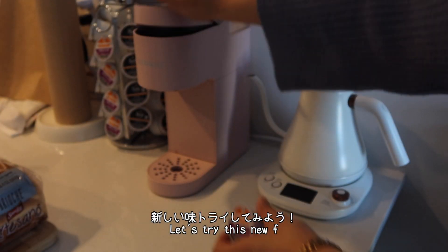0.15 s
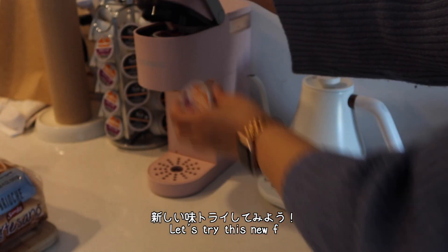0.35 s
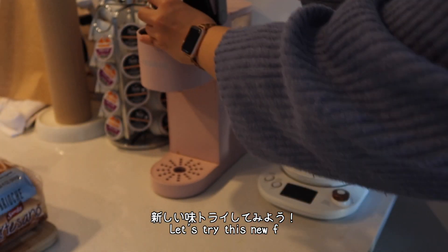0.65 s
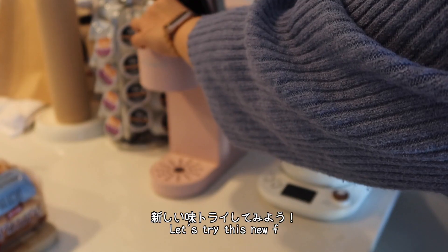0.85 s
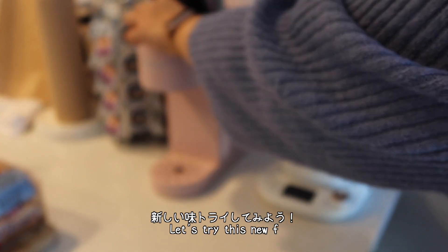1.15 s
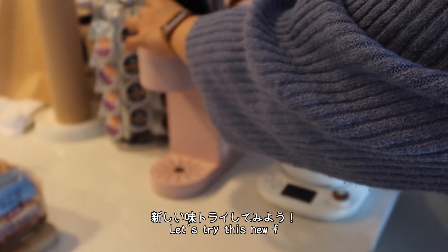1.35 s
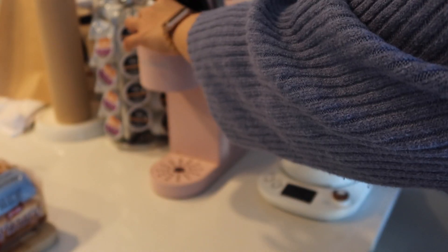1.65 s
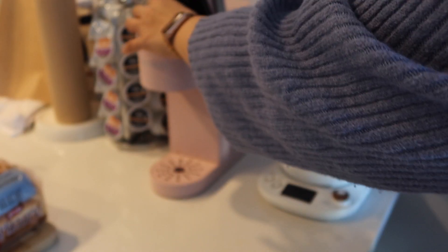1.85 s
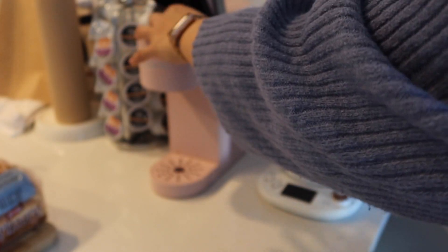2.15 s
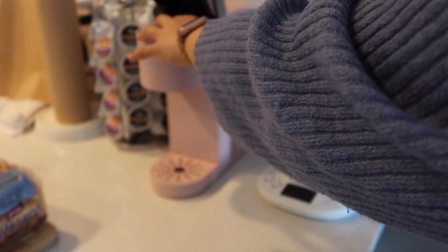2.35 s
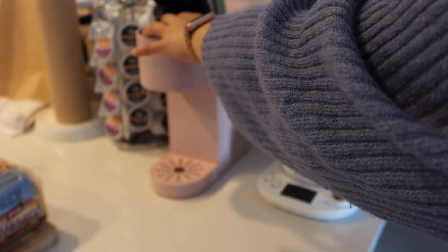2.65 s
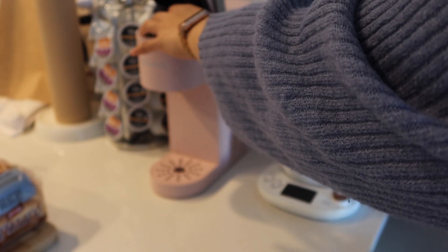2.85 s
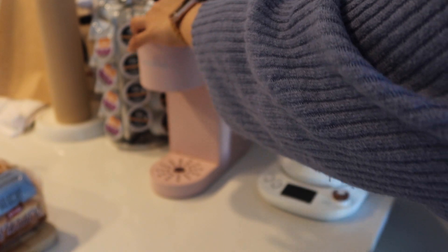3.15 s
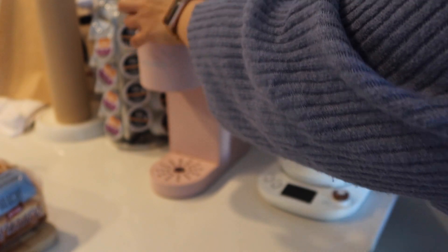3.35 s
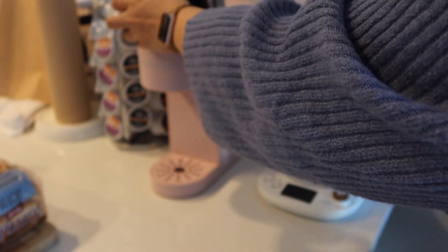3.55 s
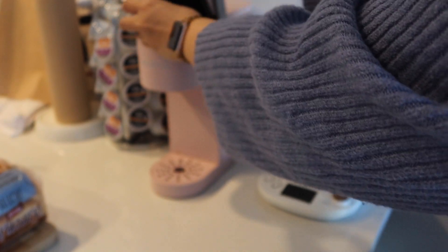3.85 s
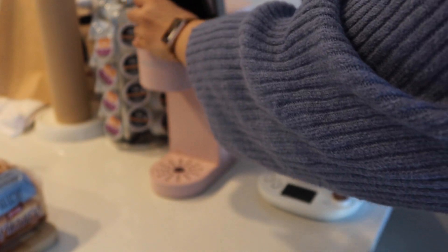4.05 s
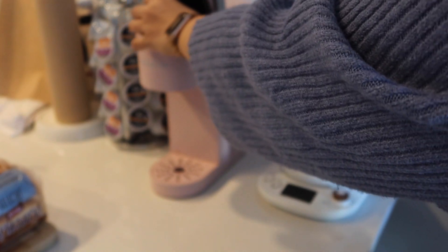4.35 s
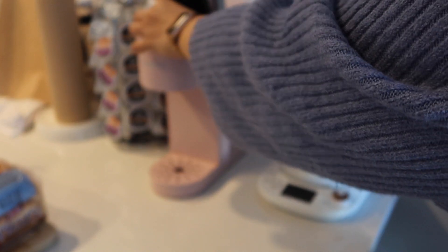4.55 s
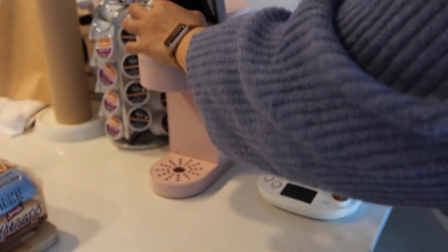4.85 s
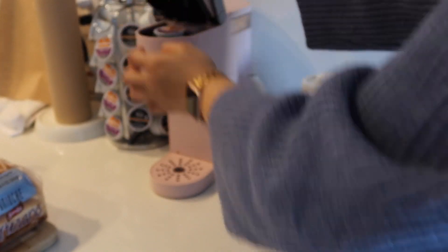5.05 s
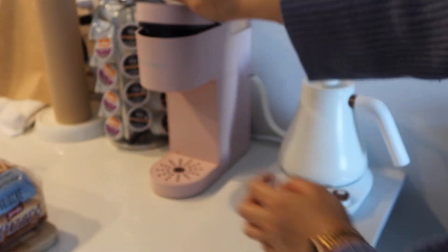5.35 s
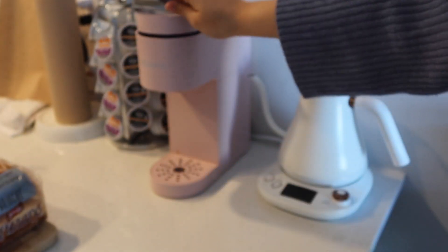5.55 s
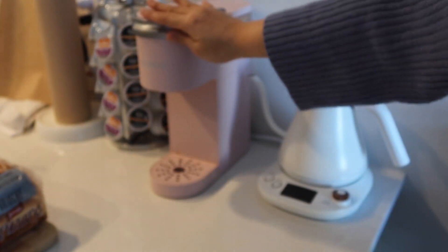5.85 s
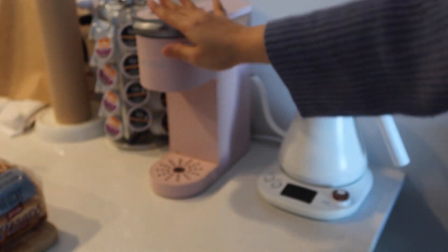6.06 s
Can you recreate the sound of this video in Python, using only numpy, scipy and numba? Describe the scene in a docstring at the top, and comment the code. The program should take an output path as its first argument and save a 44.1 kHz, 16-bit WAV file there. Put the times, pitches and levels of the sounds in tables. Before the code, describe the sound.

Small hollow plastic knocks, clicks and finger rubs over quiet room air end in one very loud, bright latch snap with a brief rattle.

```python
"""Pod coffee maker, lid and latch

On a kitchen counter, about a metre from a nearly mono microphone: the lid is pulled open, a pod is pushed
into its holder and turned, then the lid is pressed down until its latch snaps.
Each blow rings a plastic part as damped modes and dense noise, and thumps the housing.
Fingers rub and plastic scrapes in tiny slips; a bare kitchen echoes it, over room air and a low hum.
The echo breaks off once, early on; at the snap a limiter ducks the level and lets the echo swell back."""
import sys
import numpy as np
from scipy import signal
from scipy.fft import rfft, irfft
from scipy.io import wavfile
from numba import njit

SR = 44100
rng = np.random.default_rng(int(sys.argv[2]) if len(sys.argv) > 2 else 0)


def log_audio(samples):
    """Write samples as a 16-bit WAV file to the path given in sys.argv[1]."""
    # one column per channel
    frames = np.atleast_2d(samples).T
    # limit to full scale, then quantise
    limited = np.clip(frames, -1, 1)
    pcm = np.round(limited * 32767).astype(np.int16)
    wavfile.write(sys.argv[1], SR, pcm)


N = 274302
TIME = np.arange(N) / SR
RING_TIME = np.arange(SR // 4) / SR


def undb(db):
    """Decibels to gain."""
    return 10 ** (np.asarray(db) / 20)


def on_log(points, hz):
    """Read (Hz, value) points on a log-frequency axis."""
    f, value = np.transpose(points)
    return np.interp(np.log(np.maximum(hz, 1)), np.log(f), value)


def colour(x, points):
    """Shape a noise by a (Hz, dB) spectrum."""
    gain = undb(on_log(points, np.fft.rfftfreq(len(x), 1 / SR)))
    return irfft(rfft(x) * gain, len(x))


def level(x, db):
    """Set the rms level."""
    return x * undb(db) / np.sqrt(np.mean(x ** 2))


def attack_level(x, db):
    """Set the rms level of the first hundredth of a second."""
    return x * undb(db) / np.sqrt(np.mean(x[:SR // 100] ** 2))


def add(track, s, sound):
    """Mix a sound into the track at time s."""
    start = int(s * SR)
    track[start:start + len(sound)] += sound[:N - start]


def fade(t, t60):
    """Exponential decay, 60 dB down after t60."""
    return np.exp(-np.log(1000) * t / t60)


def soften(x, hz):
    """A softer contact pushes for longer and excites less treble."""
    pole = signal.butter(1, min(hz, SR / 3), fs=SR, output="sos")
    return signal.sosfilt(pole, signal.sosfilt(pole, x))


def arch(s, length):
    """One smooth rise and fall around time s."""
    return np.cos(np.pi * np.clip((TIME - s) / length, -.5, .5))


def swells(rows, rest_db):
    """Gain that rises and falls in one smooth arch per row, over a resting level."""
    arches = [undb(db) * arch(s, length) for s, length, db in rows]
    return np.sqrt(undb(rest_db) ** 2 + np.sum(np.square(arches), axis=0))


def drift(count):
    """Slow random wandering through evenly spaced points."""
    return np.interp(TIME, np.linspace(0, N / SR, count), rng.standard_normal(count))


# spectrum of the room air: f/Hz, level/dB
AIR_SPECTRUM = [(20, -20), (31, 5), (40, 6), (70, 0.5), (110, -1.5), (290, 0.5), (500, -8), (1000, -11.5),
                (2000, -18.5), (4500, -24.5), (8000, -31), (13000, -39), (15500, -50)]
# stereo width of the room air: f/Hz, side minus mid level/dB
AIR_WIDTH = [(60, -29), (110, -10), (200, -10), (380, -2.5), (700, -4), (1290, -1.5), (2380, 0), (4400, -1),
             (8120, -1.5), (15000, 1.5)]


def room_air(air_db=-46, swell_db=1.9):
    """Steady air noise of the kitchen, wide in the treble, its level drifting slowly."""
    mid, other = (level(colour(rng.standard_normal(N), AIR_SPECTRUM), air_db) for _ in range(2))
    side = colour(other, AIR_WIDTH)
    return np.array([mid + side, mid - side]) * undb(swell_db * drift(count=30))


# swells of the low hum: middle t/s, length t/s, level/dB
HUM_ARCHES = [(0.05, 0.85, -47.5), (0.9, 0.62, -41.5)]


def appliance_hum(hum_hz=75, waver_hz=6, rest_db=-55):
    """A low appliance hum: one sine whose pitch wavers."""
    pitch_hz = hum_hz + waver_hz * drift(count=60)
    hum = level(np.sin(2 * np.pi * np.cumsum(pitch_hz) / SR), 0)
    return hum * swells(HUM_ARCHES, rest_db)


# decay of the kitchen echo: f/Hz, t60 t/s
ECHO_T60 = [(100, 1.05), (400, 0.4364), (1500, 0.4554), (5000, 0.58), (8000, 0.3), (14000, 0.19)]
# colour of the kitchen echo: f/Hz, level/dB
ECHO_COLOUR = [(60, -4), (200, -5.5), (500, -2), (1500, -3), (5000, -8.5), (8000, -6.5), (15000, -7)]


def room_tail(build_s=0.0026):
    """Diffuse echo that builds up within milliseconds; every band dies at its own rate."""
    t = np.arange(SR) / SR
    noise, hz = rfft(rng.standard_normal(SR)), np.fft.rfftfreq(SR, 1 / SR)
    edges = np.geomspace(40, 20000, 16)
    tail = np.zeros(SR)
    for low, high in zip(edges, edges[1:]):
        band = irfft(noise * (hz >= low) * (hz < high), SR)
        tail += band * fade(t, on_log(ECHO_T60, np.sqrt(low * high)))
    tail = tail / np.sqrt(np.sum(tail ** 2))
    return colour(tail, ECHO_COLOUR) * (1 - np.exp(-t / build_s))


# stereo width of the echo: f/Hz, side minus mid level/dB
ECHO_WIDTH = [(100, -76), (500, -26), (1500, -24), (2500, -16), (4500, -9), (9000, 3.5)]


def kitchen(dry, echo_db=1, echo_cut_s=.753):
    """Direct sound, alike left and right, plus stereo echo; the ringing echo breaks off at echo_cut_s."""
    mid, side = room_tail(), colour(room_tail(), ECHO_WIDTH)
    spans = np.split(dry, [int(echo_cut_s * SR)])
    echo = []
    for tail in (mid + side, mid - side):
        # each span echoes only within itself
        echo.append(np.concatenate([signal.fftconvolve(span, tail)[:len(span)] for span in spans]))
    return dry + undb(echo_db) * np.array(echo)


# the crowd of short, overlapping plastic resonances: f/Hz, level/dB
SHELL_SPECTRUM = [(100, -24), (300, 3.5), (900, 5), (2500, 1.5), (6000, 0), (8000, -4), (15000, -6.5)]


def shell_ring(t60):
    """A plastic shell has so many close modes that it rings like fading coloured noise."""
    return colour(rng.standard_normal(len(RING_TIME)), SHELL_SPECTRUM) * fade(RING_TIME, t60)


def ring(modes, detune):
    """Damped modes of alternating sign; the grip shifts their pitch a little on every blow."""
    shift = 1 + detune * rng.standard_normal(len(modes))
    total = np.zeros(len(RING_TIME))
    for k, (hz, db, t60) in enumerate(modes):
        wave = np.sin(2 * np.pi * hz * shift[k] * RING_TIME)
        total += (-1) ** k * undb(db) * fade(RING_TIME, t60) * wave
    return total


# modes of the machine housing: f/Hz, level/dB, t60 t/s
HOUSING_MODES = [(85, -11.5, 0.062), (121, -14, 0.15), (189.2, 6, 0.036), (230, 2.5, 0.05),
                 (275.8, -1.5, 0.074)]


def blows(rows, modes, shell_db, shell_t60, detune, touch_db=-13, touch_s=0.0024):
    """Each blow rings the part's own modes and its dense shell resonances, and thumps the housing."""
    track = np.zeros(N)
    for s, db, bright_hz, thump_db in rows:
        shell, touch = shell_ring(shell_t60), shell_ring(shell_t60)
        part = attack_level(ring(modes, detune), 0) + attack_level(shell, shell_db)
        thump = attack_level(ring(HOUSING_MODES, detune=0.072), thump_db)
        add(track, s, attack_level(soften(part, bright_hz), db) + thump)
        # the surfaces graze each other just before they meet
        add(track, s - touch_s, attack_level(soften(touch, bright_hz), db + touch_db))
    return track


# strokes of the fingers over the plastic: middle t/s, length t/s, level/dB
FINGER_STROKES = [(0.25, 0.88, -45), (1.25, 0.75, -46), (2.25, 0.15, -55.5), (3.35, 0.37, -41.5),
                  (3.96, 0.26, -43.5), (4.5, 0.86, -58), (5.8, 0.95, -40.5)]


def rubbing(bright_hz=1000, t60=0.013, grip_db=-60):
    """Fingers stick and slip: tiny uneven clicks into the shell; the resting hand never keeps quite still."""
    clicks = (rng.random(N) < 250 / SR) * rng.standard_normal(N)  # about 250 a second
    rub = signal.fftconvolve(clicks, shell_ring(t60))[:N]
    return level(soften(rub, bright_hz), 0) * swells(FINGER_STROKES, grip_db)


# sharp dry ticks: t/s, level/dB
EDGE_TICKS = [(0.107, -42), (0.641, -39.5), (0.650, -48), (1.114, -45), (1.287, -53), (3.035, -61),
              (3.279, -46), (3.288, -51), (4.652, -48), (5.292, -44.5), (5.3695, -38), (5.458, -41)]


def ticks(t60=0.0079, low_hz=2500):
    """Hard edges flick past each other, too lightly to ring a part."""
    track = np.zeros(N)
    treble = signal.butter(2, low_hz, "high", fs=SR, output="sos")
    for s, db in EDGE_TICKS:
        burst = rng.standard_normal(len(RING_TIME)) * fade(RING_TIME, t60)
        add(track, s, attack_level(signal.sosfilt(treble, burst), db))
    return track


def slips(per_s, t60, count=4):
    """Tiny uneven stick-slip clicks, each ringing one of several spots of the plastic shell."""
    total = np.zeros(N)
    for _ in range(count):
        clicks = (rng.random(N) < per_s / count / SR) * rng.standard_normal(N)
        total += signal.oaconvolve(clicks, shell_ring(t60))[:N]
    return total


# plastic scraping over plastic as the lid or pod slides: middle t/s, length t/s, level/dB, brightness f/Hz
SLIDES = [(0.171, 0.043, -28, 3720), (0.211, 0.052, -32.5, 3200), (0.706, 0.014, -25, 3000),
          (3.118, 0.21, -36, 1400), (5.769, 0.01, -25, 7000)]


def scrapes():
    """Plastic grinds over plastic in a dense, grainy run of slips."""
    grains = slips(per_s=980, t60=0.0099)
    track = np.zeros(N)
    for s, length, db, bright_hz in SLIDES:
        track += level(soften(grains, bright_hz), db) * arch(s, length)
    return track


# side of the pod against the holder: t/s, level/dB, contact brightness f/Hz, thump level/dB, favoured f/Hz
WALL_BLOWS = [(1.001, -28.5, 5100, -47, 2290), (1.113, -30.5, 4600, -39, 1390),
              (3.3893, -31, 1900, -33.5, 1770), (4.158, -42.5, 1190, -45.5, 900),
              (4.224, -24, 1740, -46, 1140)]
# modes of the holder wall contact: f/Hz, level/dB, t60 t/s
WALL_MODES = [(713, -2.5, 0.016), (1098, -1.5, 0.028), (1216, -8.5, 0.081), (1390, -2, 0.013),
              (2010, -4.5, 0.024), (2460, -3.5, 0.018)]


def wall_knocks(octave_db=4.5):
    """The spot where the pod meets the holder decides which of its modes ring most."""
    track = np.zeros(N)
    for *blow, favoured_hz in WALL_BLOWS:
        # modes lose octave_db per octave away from the favoured pitch
        modes = [(hz, db - octave_db * abs(np.log2(hz / favoured_hz)), t60) for hz, db, t60 in WALL_MODES]
        track += blows([blow], modes, shell_db=-9, shell_t60=.022, detune=.006, touch_db=-30)
    return track


# pod rim catching as it turns: t/s, level/dB, contact brightness f/Hz, thump level/dB, top mode pitch ratio
RIM_CATCHES = [(1.154, -27.5, 4200, -31.5, 0.915), (1.288, -44, 4030, -41, 0.93),
               (2.255, -54, 6000, -59, 1), (2.6422, -50, 6000, -47, 1), (4.652, -26.5, 4550, -35.5, 0.99)]
# modes of the pod rim: f/Hz, level/dB, t60 t/s
RIM_MODES = [(597, -6, 0.029), (1212, -0.5, 0.055), (1367, -6.5, 0.037), (1525, -5, 0.025),
             (2870, -3.5, 0.035), (3130, -7.5, 0.036)]


def rim_clicks():
    """The rim pings; the tighter the pod is wedged, the higher its upper modes ring."""
    track, top_hz = np.zeros(N), RIM_MODES[-1][0]
    for *blow, pitch in RIM_CATCHES:
        modes = [(hz * pitch ** ((hz / top_hz) ** 2), db, t60) for hz, db, t60 in RIM_MODES]
        track += blows([blow], modes, shell_db=-7, shell_t60=.025, detune=.003, touch_db=-13, touch_s=.0035)
    return track


def rebounding(pushes, count=2, gap_s=0.0078, gap_growth=2.9, dulling=0.47):
    """The pod rebounds as it settles after a push, each time after a longer gap and duller."""
    knocks = []
    for s, db, bright_hz, thump_db, rebound_db, drop_db in pushes:
        knocks.append((s, db, bright_hz, thump_db))
        for k in range(count):
            s = s + gap_s * gap_growth ** k
            change_db = rebound_db - k * drop_db
            knocks.append((s, db + change_db, bright_hz * dulling ** (k + 1), thump_db + change_db))
    return knocks


# pod pushed down into its hollow holder: t/s, level/dB, contact brightness f/Hz, housing thump level/dB,
# first rebound re push level/dB, level drop from first to second rebound/dB (negative: the second is louder)
PUSHES = [(1.125, -32.5, 1050, -58, -3, 14), (1.435, -44.5, 694, -47, -2, -1),
          (1.563, -40.5, 1500, -42.5, -19, -19), (1.584, -42, 1500, -57, -10, 3),
          (3.004, -29.5, 3100, -38, -23, 9), (3.0275, -15.5, 2600, -32, -3, -0.5),
          (3.179, -24, 1010, -72, 2.5, 16), (3.280, -31.5, 2810, -54, -11, 12),
          (3.773, -36.5, 2200, -39.5, -14, -2), (3.953, -37, 2420, -38.5, -1.5, -2),
          (4.656, -36, 810, -48, -4, 5)]
# modes of pod and holder: f/Hz, level/dB, t60 t/s
POD_MODES = [(375, -1, 0.062), (446, 0, 0.054), (619, 0.5, 0.042), (834, 1.5, 0.061), (938, -0.5, 0.057),
             (1200, 0.5, 0.02), (1428, -5.5, 0.04), (1640, -3, 0.022), (2670, -3.5, 0.012)]


def pod_pushes():
    """The pod knocks and rebounds in its hollow holder, whose shell rings on longest."""
    return blows(rebounding(PUSHES), POD_MODES, shell_db=-7.0, shell_t60=0.14, detune=0.02, touch_db=-24)


# clacks of the handle linkage: t/s, level/dB, contact brightness f/Hz, housing thump level/dB
LINKAGE_CLACKS = [(0.6425, -28.5, 6450, -29), (5.2915, -27, 3150, -51), (5.2948, -27.5, 2390, -36),
                  (5.377, -29, 3500, -47), (5.3845, -14.5, 4040, -33), (5.411, -26, 1300, -38),
                  (5.458, -21, 4230, -32), (5.5345, -24, 6850, -34.5), (5.542, -29, 5000, -36)]
# modes of the handle: f/Hz, level/dB, t60 t/s
HANDLE_MODES = [(508, -12.5, 0.057), (1037, -2, 0.017), (1412, 0, 0.036), (1840, 2.5, 0.033),
                (2356, 3, 0.015), (2800, 3, 0.023), (3340, 8, 0.0099), (4750, 0, 0.0087)]


def handle_clacks():
    """The linkage of the handle clacks as it swings."""
    return blows(LINKAGE_CLACKS, HANDLE_MODES, shell_db=-1, shell_t60=0.043, detune=0.075, touch_db=-23)


# lid juddering on its hinge under load: start t/s, length t/s, first slip level/dB, growth level/dB,
# contact brightness f/Hz, housing thump re slip level/dB
HINGE_JUDDERS = [(0.13, 0.038, -35, 8, 1900, 0), (5.720, 0.033, -26.5, -20, 2200, 6)]


def judders(count=4, jitter_s=0.00098, scatter_db=-0.6):
    """The hinge sticks and slips: a quick, slightly uneven run of knocks that grows or dies with the load."""
    knocks = []
    for start, length, first_db, growth_db, bright_hz, thump_db in HINGE_JUDDERS:
        for along, (late, strong) in zip(np.linspace(0, 1, count), rng.standard_normal((count, 2))):
            db = first_db + growth_db * along + scatter_db * strong
            knocks.append((start + length * along + jitter_s * late, db, bright_hz, db + thump_db))
    return knocks


# separate knocks of the lid: t/s, level/dB, contact brightness f/Hz, housing thump level/dB
LID_BLOWS = [(0.058, -52, 1200, -34.5), (0.107, -34.5, 8000, -36), (0.157, -27, 5550, -37),
             (0.1785, -19.5, 5600, -27.5), (0.2005, -20, 8150, -23.5), (0.438, -44, 3020, -44),
             (0.600, -28.5, 1780, -39), (0.6065, -22.5, 1950, -27), (0.698, -23.5, 3630, -37),
             (0.706, -17.5, 2050, -13.5), (5.710, -21.5, 5500, -24), (5.744, -26.5, 2520, -21.5)]
# modes of the lid: f/Hz, level/dB, t60 t/s
LID_MODES = [(426, 3, 0.022), (605, 3.5, 0.022), (749, 4, 0.034), (986, 1, 0.041), (1340, -36, 0.01),
             (1960, -12, 0.037), (3220, -33, 0.02)]


def lid_knocks():
    """The lid knocks and judders, its dense shell louder than its own modes."""
    knocks = LID_BLOWS + judders()
    return blows(knocks, LID_MODES, shell_db=4, shell_t60=0.041, detune=0.075, touch_db=-12.0)


# rattle after the snap: start t/s, length t/s, first level/dB, fall level/dB, contact brightness f/Hz,
# housing thump re knock level/dB
LOOSE_RATTLE = (5.81, 0.13, -20.5, 17.5, 9000, -25)


def rattle(count=12, scatter_db=3):
    """Loose parts of the latch chatter at uneven moments after the snap, on the whole ever more faintly."""
    start, length, first_db, fall_db, bright_hz, thump_db = LOOSE_RATTLE
    along = (np.arange(count) + rng.random(count)) / count
    sizes = first_db - fall_db * along + scatter_db * rng.standard_normal(count)
    return [(start + length * a, db, bright_hz, db + thump_db) for a, db in zip(along, sizes)]


# the latch snapping shut: t/s, level/dB, contact brightness f/Hz, housing thump level/dB
SNAPS = [(5.773, 2, 10900, -19.5), (5.7803, -11.5, 6960, -26)]
# modes of the latch: f/Hz, level/dB, t60 t/s
LATCH_MODES = [(440, -9.5, 0.037), (585, -3, 0.011), (750, -5.5, 0.019), (1287, -10.5, 0.017),
               (1610, -10.5, 0.015), (2470, -10, 0.0057), (4600, -0.5, 0.013), (5210, -1.5, 0.005),
               (6040, -0.5, 0.0062), (7170, -13.5, 0.0017)]


def latch_snap():
    """The latch snaps hard and bright, then its loose parts rattle."""
    snap = blows(SNAPS, LATCH_MODES, shell_db=-3.5, shell_t60=0.044, detune=0.0054,
                 touch_db=-26.5, touch_s=0.0059)
    loose = blows(rattle(), LATCH_MODES, shell_db=-5.5, shell_t60=0.016, detune=0.077, touch_db=-33)
    return snap + loose


def radiate(x, low_hz=100):
    """Parts this small move too little air to give deep bass."""
    return signal.sosfilt(signal.butter(2, low_hz, "high", fs=SR, output="sos"), x)


# left and right differ in phase in the treble: f/Hz, left lead/radians
LEFT_LEAD = [(4000, 0), (5000, 0.8), (8500, 0.5), (10000, 1.2), (12000, 1), (15000, 2)]


def stereo_phase(sound):
    """Turn left and right apart in phase, half the lead each way."""
    lead = on_log(LEFT_LEAD, np.fft.rfftfreq(N + SR, 1 / SR))
    turn = np.exp(.5j * np.array([lead, -lead]))
    return irfft(rfft(sound, N + SR) * turn, N + SR)[:, :N]


def scene():
    """All parts of the machine sound from one spot in the kitchen, over room air and hum."""
    touches = rubbing() + scrapes()
    pod = wall_knocks() + rim_clicks() + pod_pushes()
    parts = touches + pod + handle_clacks() + lid_knocks() + latch_snap()
    machine = stereo_phase(kitchen(radiate(parts) + ticks()))
    return machine + room_air() + appliance_hum()


@njit
def follow_peaks(x, attack, release):
    """Envelope that rises fast and falls slowly."""
    out, e = np.empty(len(x)), 0.
    for i in range(len(x)):
        e += (x[i] - e) * (attack if x[i] > e else release)
        out[i] = e
    return out


def record(dry, ceiling_db=-2.5, reaction_s=0.00125, top_hz=15500):
    """A limiter reacts a moment late: the snap clips, then the gain ducks and lets the echo swell back."""
    attack_s, release_s = .00005, .052
    envelope = follow_peaks(np.abs(dry).max(axis=0), 1 / (attack_s * SR), 1 / (release_s * SR))
    overload = np.maximum(envelope / undb(ceiling_db), 1)
    late_overload = np.interp(TIME - reaction_s, TIME, overload)
    limited = np.clip(dry / late_overload, -1, 1)
    # steep loss of everything above top_hz
    return signal.sosfilt(signal.ellip(8, .2, 70, top_hz, fs=SR, output="sos"), limited)


dry = scene()
out = record(dry)
log_audio(out)
```